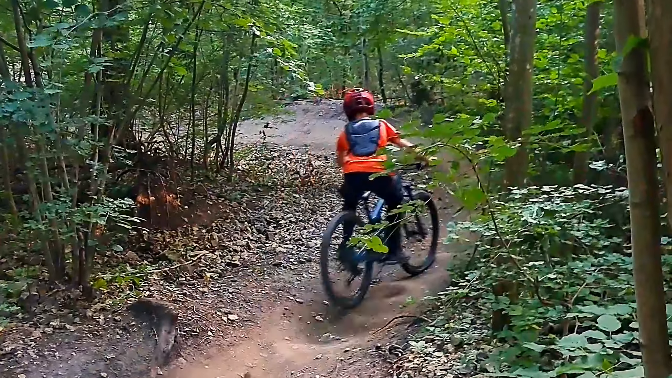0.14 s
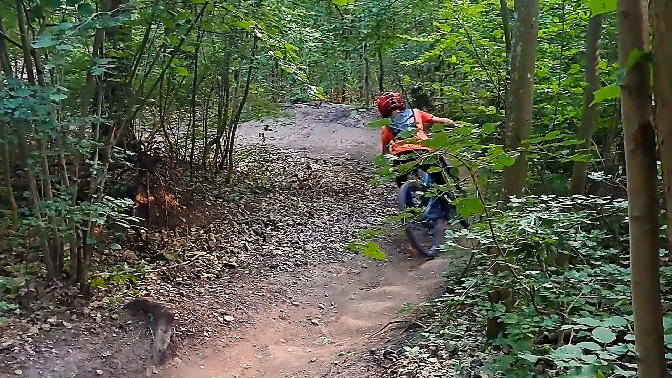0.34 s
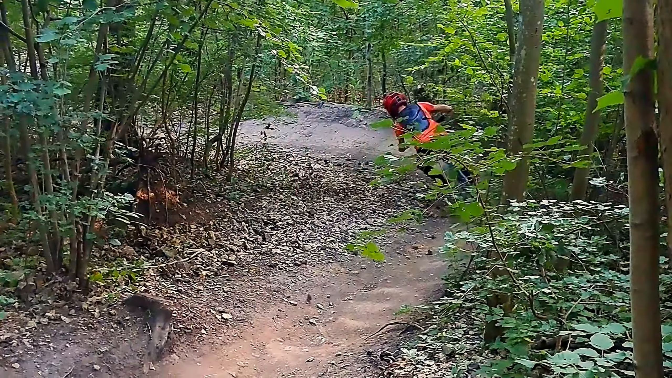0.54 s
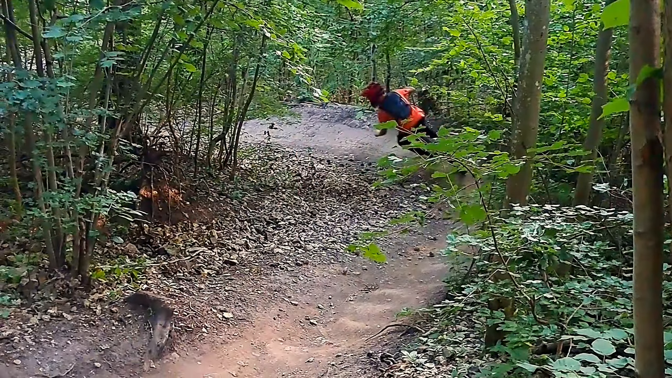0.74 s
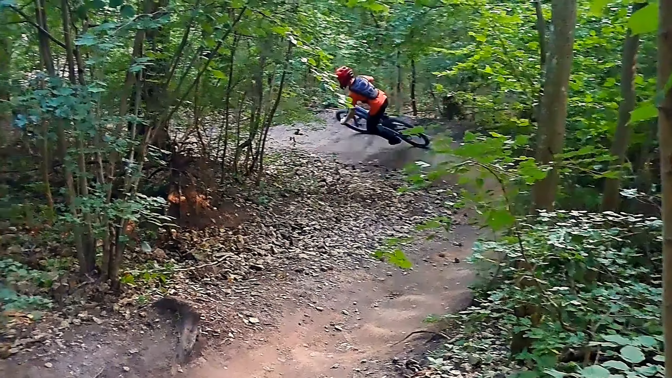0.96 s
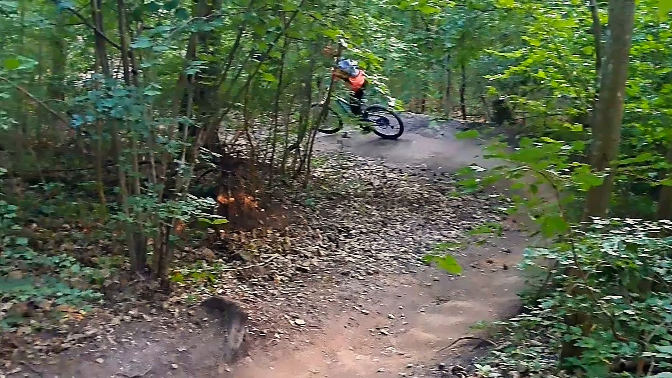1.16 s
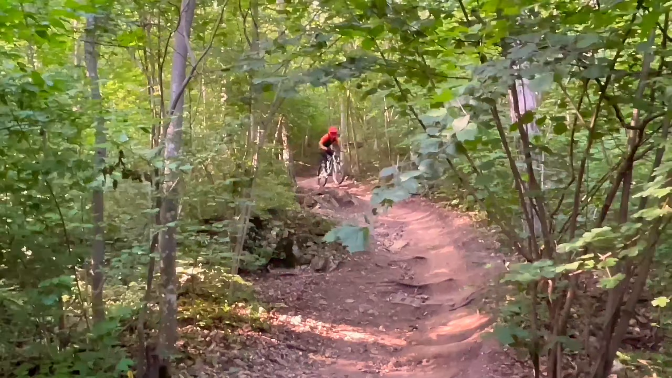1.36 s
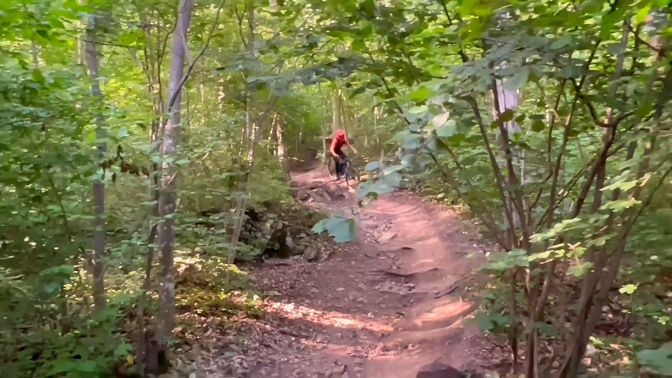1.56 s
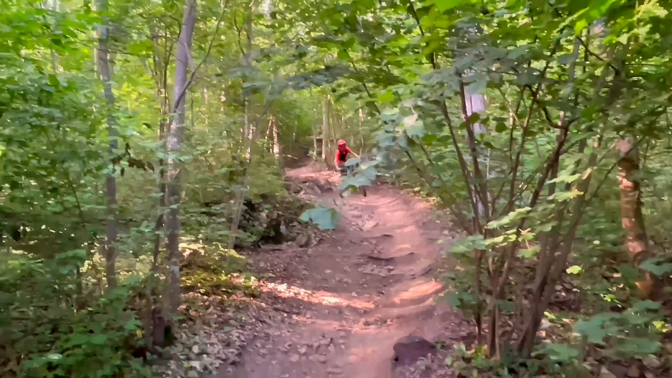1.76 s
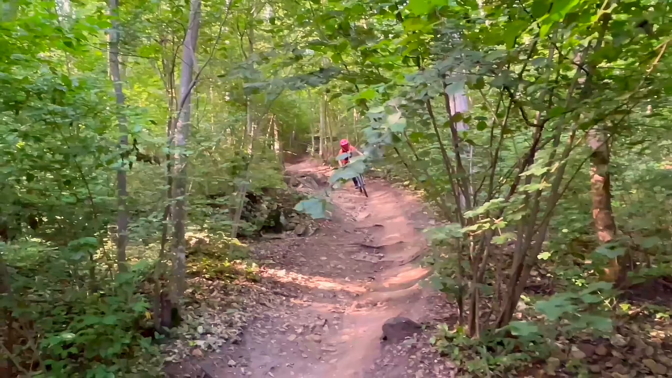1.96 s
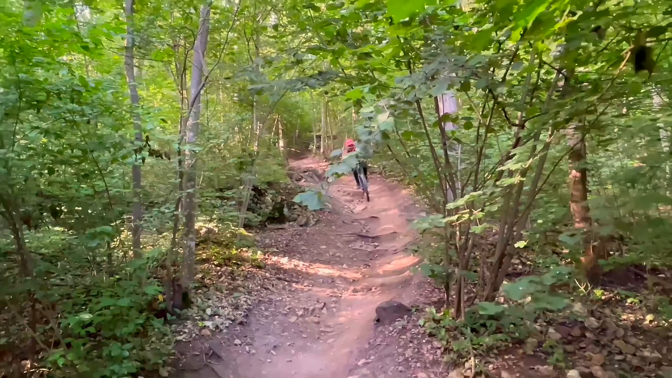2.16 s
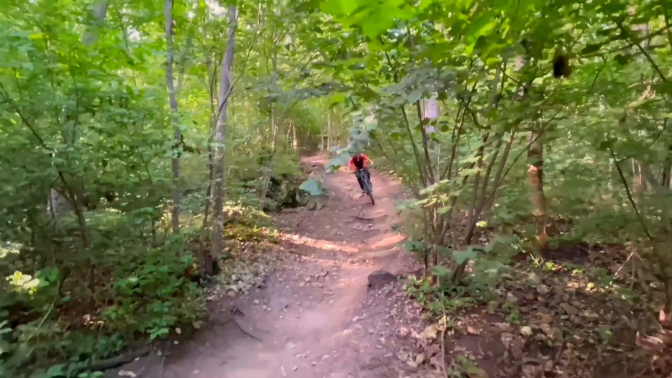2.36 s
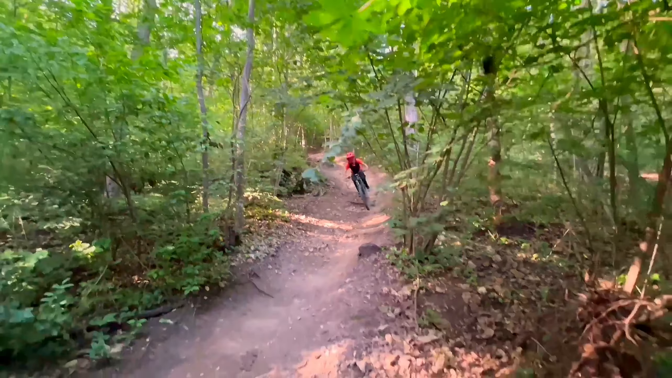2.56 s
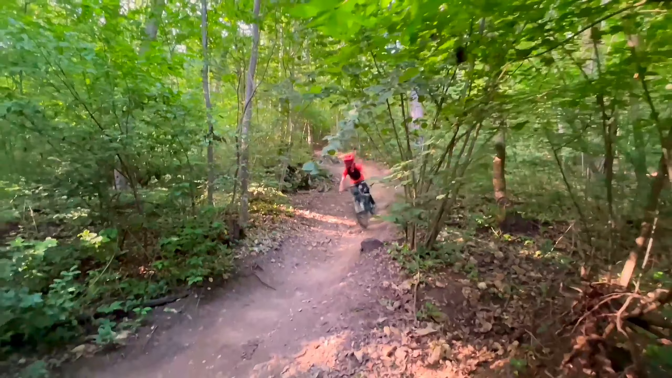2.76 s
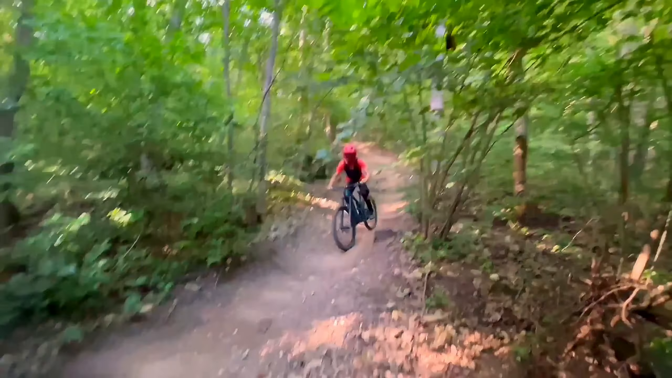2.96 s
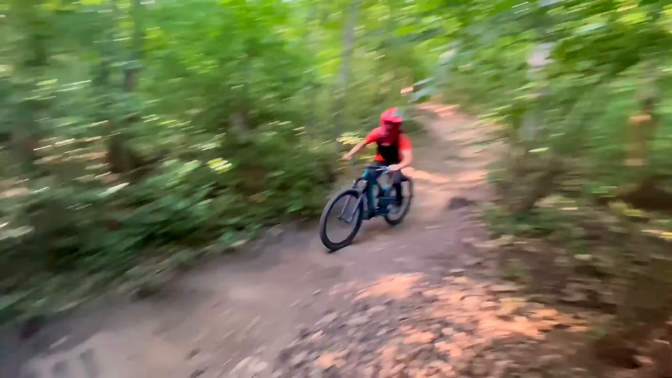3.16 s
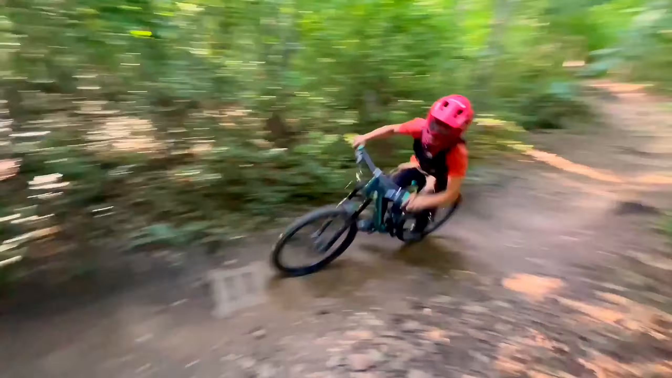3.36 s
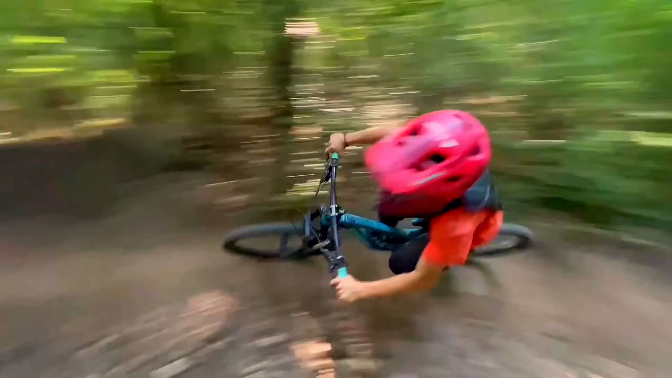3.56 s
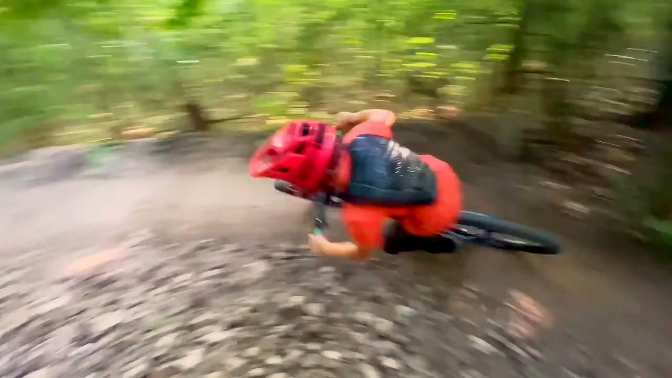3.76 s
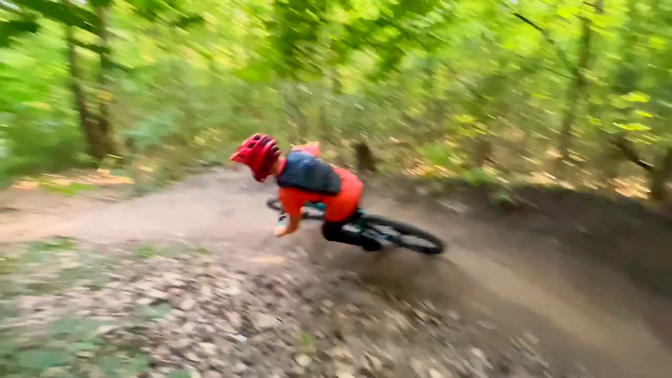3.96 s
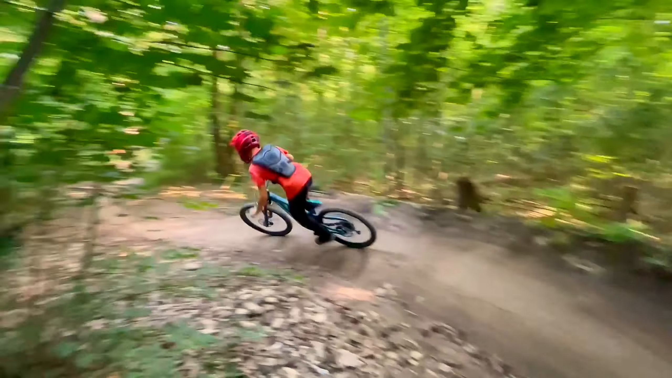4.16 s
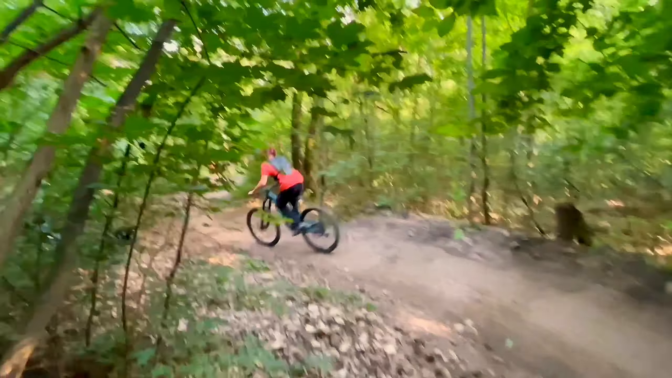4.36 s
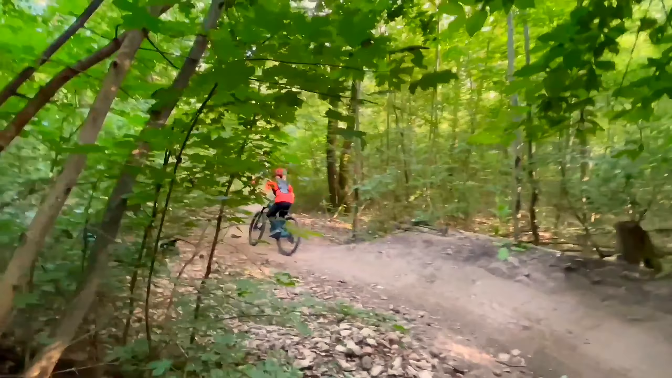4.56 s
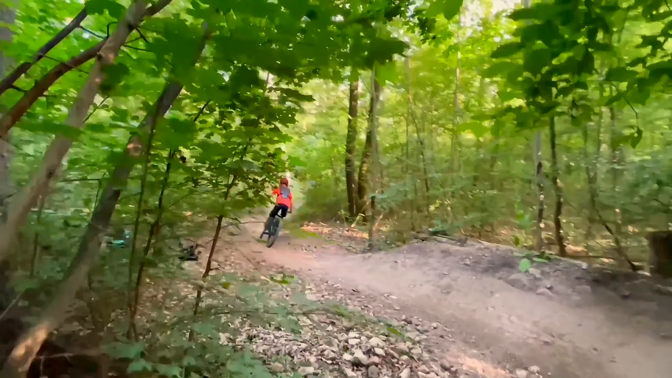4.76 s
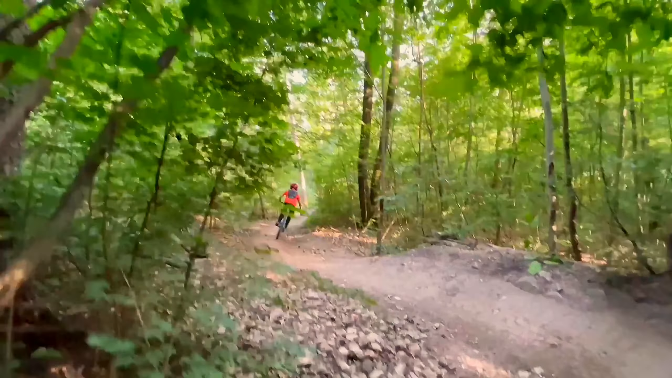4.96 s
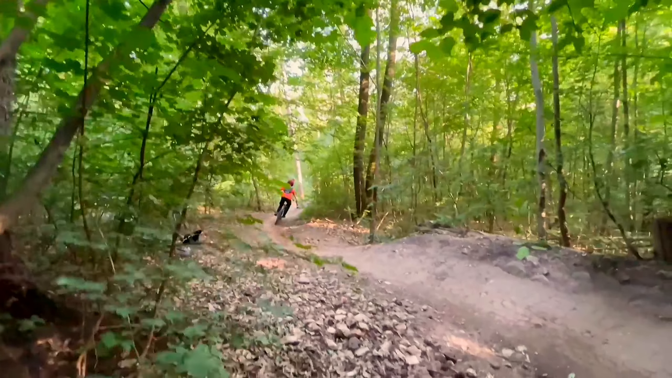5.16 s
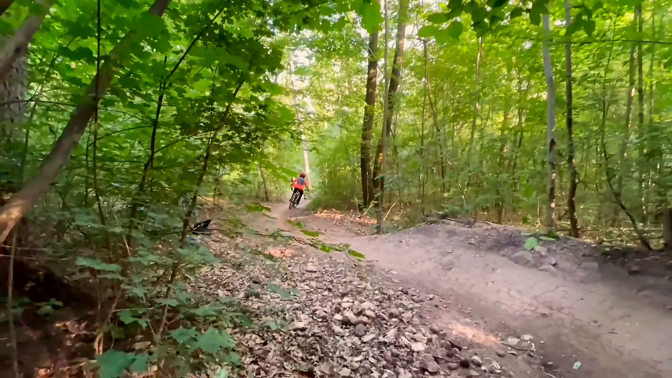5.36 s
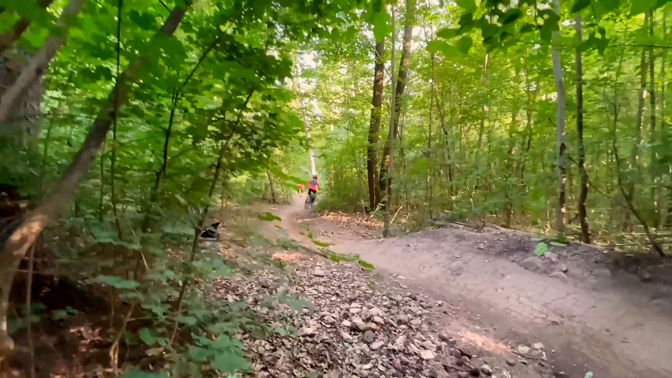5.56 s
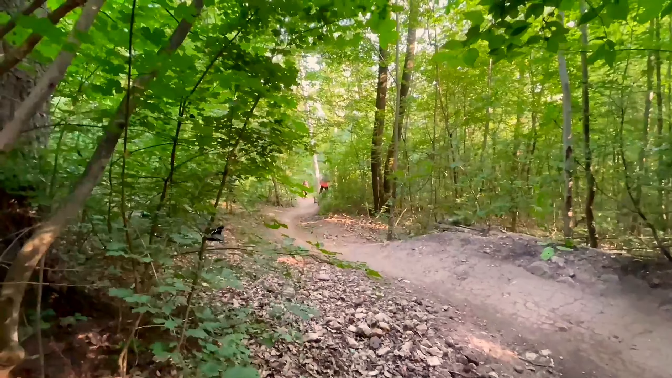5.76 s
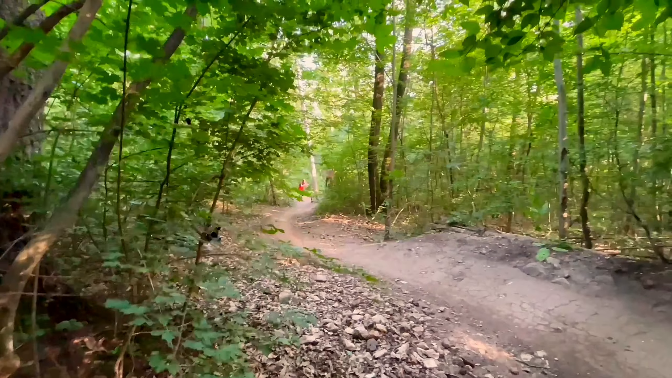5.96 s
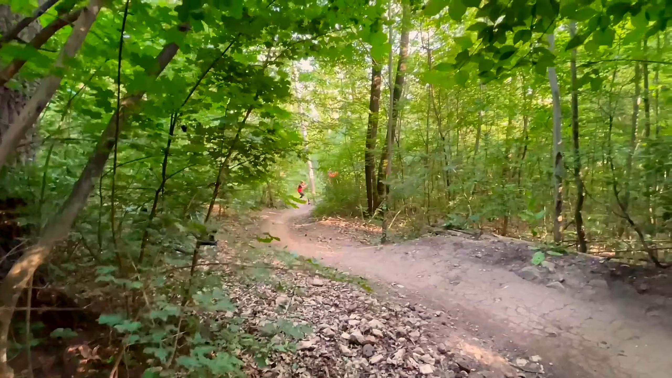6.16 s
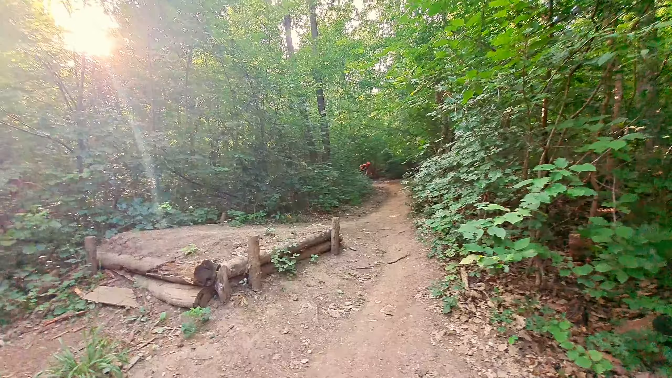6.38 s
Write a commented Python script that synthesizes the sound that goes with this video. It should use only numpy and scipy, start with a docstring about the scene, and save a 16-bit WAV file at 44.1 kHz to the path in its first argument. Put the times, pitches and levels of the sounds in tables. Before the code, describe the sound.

Outdoor stereo pickup among trees: first a bike clatters off over bumps, its tyres humming softly, and is cut to near silence. Then faint crunches and ticks from the left grow into dense chain rattle, wheel thumps and a loud rasping skid-like sweep past. It leaves quickly, with gravel crunch, thin echoes, faint wind and a few late knocks.

```python
"""A mountain bike clatters over roots and rides away down a dirt forest trail; the sound cuts to
quiet, then a bike comes nearer over more roots, carves a banked turn close by and rolls off.
Filtered noise and random grains make the tyres rumble, crunch and hiss over the soil.
Bursts and dying tones make the chain, frame and wheels clatter, thump and knock at the bumps.
Faint random echoes stand for the trees, over very quiet forest air and a late breath of wind."""
import sys
import numpy as np
from scipy import signal
from scipy.fft import rfft, irfft
from scipy.io import wavfile
from scipy.ndimage import uniform_filter1d

SR = 44100
rng = np.random.default_rng(int(sys.argv[2]) if len(sys.argv) > 2 else 0)


def generate_wav(sig):
    """Save sig (samples, or channels by samples) to the path in sys.argv[1] as 16-bit PCM at SR."""
    pcm = np.round(np.clip(np.atleast_2d(sig).T, -1, 1) * 32767).astype(np.int16)
    wavfile.write(sys.argv[1], SR, pcm)


N = 283122
TIME = np.arange(N) / SR  # seconds

# Deep noise of the ground under the tyres, and of wind. Each row: frequency in Hz, relative dB per Hz.
RUMBLE = [(20, -17), (35, -2.5), (60, 4), (95, -3.5), (140, -8.5), (220, -8.5), (400, -42.5)]
# Bright hiss of dust and grit. Each row: frequency in Hz, relative dB per Hz.
SPRAY = [(1200, -9), (2900, 0.5), (4200, 0.5), (5100, 2), (5700, 0.5), (6700, 1), (7500, -5), (8600, 1),
         (10200, -1.5), (12500, -3.5), (15000, -11)]
CUT_START_S, CUT_END_S = 1.387, 1.578  # the sound cuts to quiet air between these times


def amp(db):
    """Turns decibels into gain."""
    return 10 ** (np.asarray(db) / 20)


def unit(x):
    """Scales a sound to an average (rms) level of 1."""
    return x / np.sqrt(np.mean(x ** 2) + 1e-20)


def read(points, hz):
    """Reads a table between its points, with frequency on a log axis."""
    f, value = np.transpose(points)
    return np.interp(np.log(hz + 1), np.log(f + 1), value)


def follow(rows):
    """Reads each column of a table of times at every sample."""
    s, *columns = np.transpose(rows)
    return [np.interp(TIME, s, column) for column in columns]


def during(start, end, fade_s=0.0057):
    """Makes a gate that is 1 from start to end, with soft edges."""
    return np.clip(np.minimum(TIME - start, end - TIME) / fade_s + .5, 0, 1)


def add(mix, s, sound):
    """Mixes a sound in at time s."""
    part = mix[:, max(round(s * SR), 0):][:, :sound.shape[-1]]
    part += sound[..., :part.shape[1]]


def colour(x, points, size=4096):
    """Filters a sound to the given spectrum, without pre-echo and with unit filter energy."""
    log_gain = np.log(amp(read(points, abs(np.fft.fftfreq(size, 1 / SR)))))
    # the Hilbert transform supplies the phase that puts the response as early as possible
    spectrum = np.exp(np.conj(signal.hilbert(log_gain)))
    taps = np.fft.ifft(spectrum).real[:size // 2]
    return signal.oaconvolve(x, taps[None] / np.linalg.norm(taps), axes=1)[:, :N]


def wander(hz):
    """Drifts smoothly at random, mostly at rates near the one given, with rms 1."""
    ratio = np.fft.rfftfreq(N, 1 / SR) / hz
    noise = rfft(rng.standard_normal(N))
    return unit(irfft(noise * ratio / (1 + ratio ** 4), N))


def resonate(x, hz, width):
    """Rings a resonance of the given width in Hz, whose centre may move."""
    turn = np.exp(2j * np.pi * np.cumsum(hz * np.ones(N)) / SR)
    r = np.exp(-np.pi * width / SR)
    # shift the centre down to zero, smooth there, then shift it back up
    low = signal.lfilter([(1 - r) ** 2], [1, -2 * r, r * r], x / turn)
    return unit((turn * low).real)


def grains(per_s, spread_db, bed):
    """Scatters crumbs of uneven size over a bed of noise, the sum of countless tiny ones."""
    size_db = spread_db * np.minimum(rng.exponential(1, N), 3)
    size = amp(size_db) * (rng.random(N) < per_s / SR)
    crumbs = unit(size * rng.choice([-1, 1], (2, N)))
    return unit(crumbs + bed * rng.standard_normal((2, N)))


def rolling():
    """Gives the level of the rolling tyres in dB, and where the trail is rooty (0 to 1)."""
    # Level riding away, coming nearer and leaving. Each row: time in seconds, level in dB.
    away = [(0, -36), (.1, -33), (.16, -45.5), (.56, -46.5), (.62, -36), (.8, -46.5), (1.0, -47),
            (1.14, -41.5), (1.27, -50.5), (1.33, -61.5), (1.39, -58.5)]
    approach = [(1.681, -72), (1.73, -64.5), (1.83, -55.5), (2.2, -67), (2.33, -57), (2.58, -60.5),
                (2.73, -49.5), (3.2, -51.5), (3.41, -38), (3.47, -33), (3.62, -30.5), (3.68, -26)]
    leaving = [(3.68, -27.5), (3.78, -35), (4.1, -31.5), (4.19, -42), (4.7, -42), (4.97, -50.5),
               (5.3, -47.5), (5.55, -50.5), (5.8, -49.5), (6.08, -59.5), (6.22, -56), (6.29, -52.5),
               (6.42, -53)]
    # Stretches ribbed with roots. Each row: start in seconds, end in seconds.
    root_spans = [(0, .75), (1.68, 3.45)]
    approach_s = approach[0][0]
    level_db = np.where(TIME < approach_s, follow(away)[0], follow(approach + leaving)[0])
    level_db = level_db - 23.5 * during(CUT_START_S, approach_s)  # extra drop until the approach
    return level_db, sum(during(*span) for span in root_spans)


def clods(fade_s=0.028):
    """Swells the level, in dB, at random moments as lumps of soil give way, then lets it die away."""
    clods_per_s, clod_db = 38, 2
    strikes = np.minimum(rng.exponential(1, N), 2) * (rng.random(N) < clods_per_s / SR)
    swell = signal.lfilter([1], [1, -np.exp(-1 / (fade_s * SR))], strikes)
    return clod_db * (swell - swell.mean())


def tyres():
    """Rolling tyres shake the ground, hum, crush crumbs of soil and hiss brightly."""
    # Soil crunching. Each row: frequency in Hz, relative dB per Hz.
    crunch_spectrum = [(70, -24.5), (150, -1.5), (250, 1), (400, -0.5), (560, -0.5), (750, -4.5),
                       (1000, -4.5), (1300, -6.5), (1800, -5.5), (2350, -11), (3100, -18.5), (4500, -23.5),
                       (9000, -46.5)]
    # Swells of bright hiss; the one at 1.64 s is faint background hiss.
    # Each row: middle in seconds, half length in seconds, level in dB.
    hiss_swells = [(0.02, 0.055, -42.5), (0.25, 0.22, -45), (0.647, 0.11, -42.5), (1.297, 0.1, -60.5),
                   (1.64, .06, -82), (1.874, 0.11, -65), (2.468, 0.046, -62), (2.795, 0.071, -50.5),
                   (3.332, 0.11, -48.5), (3.654, 0.15, -36.5), (4.22, 0.057, -43.5), (4.342, 0.057, -40.5),
                   (4.522, 0.084, -48.5), (4.783, 0.16, -54.5), (4.965, 0.2, -55.5), (6.257, 0.021, -54),
                   (6.338, 0.29, -58)]
    # Tread humming on hard-packed ground.
    # Each row: start in seconds, end in seconds, pitch in Hz, level in dB against the rolling.
    hum_spans = [(0.293, 1.043, 587, -4), (0.987, 1.31, 282, -15), (1.758, 2.05, 535, -3),
                 (3.602, 4.157, 409, -4.5), (4.48, 5.837, 241, -7), (6.268, 6.41, 425, -1),
                 (6.338, 6.41, 620, 1)]
    rumble_db, rooty_rumble_db, spray_db = -9.5, 6.5, -10.5  # rumble and spray against the rolling
    far_db, far_dulling = -54.5, 0.94  # below far_db the spray loses extra dB for each dB

    roll_db, rooty = rolling()
    ground = wander(hz=41.7)  # lumps in the trail press the tyre harder
    low = colour(rng.standard_normal((2, N)), RUMBLE)
    low = low * amp(roll_db + rumble_db + rooty_rumble_db * rooty)

    mid = colour(grains(per_s=1200, spread_db=0.5, bed=0.83), crunch_spectrum)
    mid = mid * amp(roll_db + 0.93 * ground + clods())

    swells = sum(amp(db) * np.exp(-((TIME - s) / half) ** 2) for s, half, db in hiss_swells)
    spray = amp(roll_db + spray_db - far_dulling * np.maximum(far_db - roll_db, 0))
    high = colour(grains(per_s=1200, spread_db=6.5, bed=2.1), SPRAY)
    high = high * np.hypot(spray, swells) * amp(0.34 * ground)

    tread = rng.standard_normal((2, N))
    hum = np.zeros((2, N))
    for start, end, hz, db in hum_spans:
        hum += resonate(tread, hz, width=142) * amp(db) * during(start, end, fade_s=0.037)
    return low + mid + high + hum * amp(roll_db + 1.8 * wander(hz=25))


def gravel():
    """Loose gravel grinds under the tread as random grains of uneven size."""
    # Each row: start in seconds, end in seconds, grains per second, level in dB against the rolling.
    gravel_spans = [(1.77, 2.6, 150, -10.5), (2.594, 3.348, 160, -13), (3.497, 3.76, 240, -7.5),
                    (4.286, 4.405, 700, 2), (4.4, 5.93, 214, -8)]
    # Sound of the grains. Each row: frequency in Hz, relative dB per Hz.
    pebble_spectrum = [(250, -19), (600, 7.5), (1000, 3), (2000, 3.5), (2800, -23.5), (3600, -15.5),
                       (5000, -9.5), (8000, -21), (14000, -30)]
    crunch = np.zeros((2, N))
    for start, end, per_s, db in gravel_spans:
        grit = grains(per_s=per_s, spread_db=4.5, bed=0.05)
        crunch += grit * amp(db) * during(start, end, fade_s=0.15)
    return colour(crunch, pebble_spectrum) * amp(rolling()[0] + 1.3 * wander(hz=50))


def bright_crackle():
    """Sparse grains through one resonance crackle brightly around 3 kHz as the bike approaches."""
    start_s, end_s, centre_hz, level_db = 2.34, 3, 3250, -8.5  # level against the rolling
    crackle = resonate(grains(per_s=120, spread_db=2.5, bed=0.088), centre_hz, width=1100)
    return crackle * amp(rolling()[0] + level_db) * during(start_s, end_s, fade_s=0.064)


def tread_notes():
    """Evenly spaced tread knobs strike smooth ground and sing clear, gliding notes."""
    # Each row: start in seconds, end in seconds, first pitch in Hz, last pitch in Hz, level in dB.
    # The pitches are those before a slight random waver.
    note_rows = [(0.885, 0.982, 251, 264, -52.5), (1.091, 1.179, 290, 245, -44),
                 (1.044, 1.25, 139.4, 128, -49.5), (3.804, 3.997, 272, 256.2, -32),
                 (4.043, 4.165, 148, 145, -35.5), (4.93, 5.072, 249, 239, -56)]
    waver = 1 + 0.013 * wander(hz=30)
    out = np.zeros((2, N))
    for start, end, first_hz, last_hz, db in note_rows:
        glide_hz = np.interp(TIME, [start, end], [first_hz, last_hz])
        turns = np.cumsum(glide_hz * waver) / SR
        # only the part common to both channels
        out[0] += amp(db) * np.sin(2 * np.pi * turns) * during(start, end, fade_s=0.04)
    return out * amp(0.53 * wander(hz=40))


def banked_turn():
    """Leaning hard, the side knobs slip and snap back: the carcass drones and the tread rasps."""
    # Tyre resonances. Each row: centre in Hz, width in Hz, relative level in dB.
    carcass = [(272, 124, -0.5), (854, 92, -8.5), (3700, 1800, -9)]
    turn_start_s, turn_end_s, attack_s, release_s = 3.56, 4.138, 0.026, 0.01
    drone_end_db, drone_rise = -30, 30  # level at the end of the turn, growth towards it in dB per s
    scrub_full_db, scrub_full_s, scrub_rise = -30.5, 3.913, 64  # the rasp; its growth in dB per s
    scrub_start_hz, scrub_glide, scrub_width_hz = 1490, 140, 530  # the glide is in Hz per s

    rise = (TIME - turn_start_s) / attack_s
    fall = 1 - (TIME - turn_end_s) / release_s
    lean = np.clip(np.minimum(rise, fall), 0, 1)
    drone_db = drone_end_db - drone_rise * np.maximum(turn_end_s - TIME, 0)
    scrub_db = scrub_full_db - scrub_rise * np.maximum(scrub_full_s - TIME, 0)

    # about 135 slips a second, at an uneven pace; each starts sharply and fades
    knobs = np.cumsum(135 * (1 + 0.32 * wander(hz=63.2))) / SR
    slips = unit(.5 + np.exp(-(knobs % 1) / 0.19))
    drive = slips * grains(per_s=2700, spread_db=2.0, bed=0.5)
    drone = unit(sum(amp(db) * resonate(drive, hz, width) for hz, width, db in carcass))

    # the rasp rises as the tread bites harder
    scrub_hz = scrub_start_hz + scrub_glide * np.clip(TIME - scrub_full_s, 0, .3)
    scrub_hz = scrub_hz * (1 + .05 * wander(hz=46))  # grip comes and goes
    scrub = resonate(resonate(drive, scrub_hz, scrub_width_hz), scrub_hz, scrub_width_hz)
    return (drone * amp(drone_db) + scrub * amp(scrub_db)) * lean


def jolts():
    """Adds lesser bumps at random moments on the rooty stretches, as rows like those in bumps()."""
    jolts_per_s, clatter_db, thump_db, spread_db = 11, -2, 9, 0.5  # levels against the rolling
    roll_db, rooty = rolling()
    at = np.flatnonzero(rng.random(N) < rooty * jolts_per_s / SR)
    level_db = roll_db + spread_db * rng.standard_normal(N)
    return [(i / SR, level_db[i] + clatter_db, level_db[i] + thump_db, 0) for i in at]


def ring(modes, t, detune):
    """Sums dying tones, a little out of tune from one blow to the next."""
    shift = np.exp(detune * rng.standard_normal(len(modes)))
    out = np.zeros(len(t))
    for k, (hz, db, t60) in enumerate(modes):
        out += (-1) ** k * amp(db - 60 * t / t60) * np.sin(2 * np.pi * hz * shift[k] * t)
    return out


def bumps():
    """Each bump thumps a wheel, slaps the chain on the frame, sets it chattering and kicks up grit."""
    # Roots and holes. Each row: time in seconds, clatter level in dB before the trims below,
    # wheel thump level in dB, seconds the chain keeps rattling before it dies away.
    bump_rows = [(.001, -19.5, -41, 0.0037), (0.041, -29, -29, 0.02), (0.075, -22, -32.5, 0.013),
                 (0.139, -31, -39, .002), (.177, -12.5, -27, 0.021), (0.221, -23, -23.5, 0.0097),
                 (0.2749, -14, -31, 0.021), (.323, -22.5, -31.5, .001), (.365, -21, -35, 0.0018),
                 (0.442, -40, -28, 0.00052), (0.471, -22.5, -31, 0.013), (.503, -32.5, -40, 0.011),
                 (0.572, -19, -23, 0.00094), (0.594, -29, -34.5, 0.0013), (0.622, -38, -28, 0.0098),
                 (1.228, -36.5, -52, 0.021), (1.58, -52, -87.5, 0.0026), (1.679, -50.5, -41, 0.0062),
                 (1.758, -39.5, -49, .002), (1.78, -47, -54, 0.0023), (1.796, -44, -44, 0.011),
                 (1.825, -47, -57, .003), (1.887, -40, -63, 0.0035), (1.946, -40, -61, 0.0094),
                 (2.022, -45, -53, .003), (2.132, -45, -51.5, .001), (2.258, -42.5, -47, 0.0031),
                 (2.343, -44, -58, 0.004), (2.425, -39.5, -52, 0.017), (2.477, -42, -45, 0.0096),
                 (2.502, -40, -48, .001), (2.566, -43, -62, .002), (2.579, -34.5, -44, 0.0027),
                 (2.597, -41, -40, .002), (2.656, -36, -44, 0.009), (2.69, -31.5, -33, 0.01),
                 (2.75, -33.5, -38, 0.012), (2.777, -40, -50, 0.0018), (2.829, -25.5, -34.5, 0.0065),
                 (2.873, -31.5, -37, 0.0053), (2.902, -38, -52, 0.011), (2.963, -30.5, -37, 0.0038),
                 (2.986, -37, -46, .002), (3.009, -32.5, -36, 0.016), (3.041, -34.5, -53, 0.0087),
                 (3.085, -38, -50, .006), (3.102, -29, -38, 0.005), (3.142, -28, -35, 0.0046),
                 (3.16, -33, -37, 0.0053), (3.194, -28, -35, .001), (3.235, -18.5, -26, .002),
                 (3.27, -21.5, -29, 0.0071), (3.287, -31, -33, .002), (3.323, -28, -40, 0.00091),
                 (3.335, -31, -42, .002), (3.364, -19.5, -21.5, 0.013), (3.414, -16, -23, .001),
                 (3.4769, -7.5, -14, 0.0013), (3.511, -10, -19, 0.00085), (3.541, -17, -26, .001),
                 (3.567, -25, -33, 0.0015), (3.587, -30, -24, .001), (3.596, -13, -15, 0.0013),
                 (3.61, -15.5, -15, 0.003), (3.623, -6.5, -18, 0.0017), (3.655, -9.5, -33, 0.0011),
                 (3.705, -21, -28, .001), (4.194, -43, -32, .001), (4.261, -25, -46, 0.0045),
                 (4.285, -23.5, -37, .002), (4.516, -28.5, -48, .006), (4.643, -37, -54, .004),
                 (4.837, -38, -54, .002), (4.872, -37, -51, .002), (5.041, -36, -36.5, 0.008),
                 (5.363, -49, -56, .003), (6.177, -36.5, -63, 0.00092), (6.229, -37, -47, 0.014),
                 (6.253, -30, -41, 0.0032), (6.279, -41, -50, 0.0036), (6.361, -38, -46, .005)]
    # Chain and frame. Each row: frequency in Hz, relative dB per Hz.
    clatter_spectrum = [(120, -14), (250, -6.5), (400, 0.5), (600, 2.5), (800, -2.5), (1020, -1.5),
                        (1250, -2.5), (1750, -0.5), (2200, -9), (2800, -7.5), (3400, -10), (4400, -14),
                        (7000, -22.5), (12000, -39.5)]
    # Wheel and ground tones before detuning.
    # Each row: pitch in Hz, level in dB, seconds to fall by 60 dB.
    wheel_modes = [(47.8, -2, 0.12), (69, 0, 0.12), (124.3, 2, 0.069), (243, 0.5, 0.041)]
    chain_t60_s, tail_t60_s, tail_db = 0.057, 0.19, -16.5  # fast fall, then a weaker, slower tail
    strike_db, strike_lag_s = 13.5, 0.002  # first slap against the chatter, and how late it comes
    rattle_db, grit_db = -10.5, -30  # trims of the chain and the grit

    chatter, solid = np.zeros((2, 2, N))
    t = np.arange(SR // 4) / SR
    contacts = grains(per_s=2600, spread_db=1.8, bed=0.39)
    strike = amp(strike_db) * (np.arange(len(t)) == round(strike_lag_s * SR))
    for s, clatter_db, thump_db, rattle_s in bump_rows + jolts():
        burst = np.roll(contacts, -round(s * SR), axis=1)[:, :len(t)]
        after = np.maximum(t - rattle_s, 0)
        fall = amp(-60 * after / chain_t60_s) + amp(tail_db - 60 * after / tail_t60_s)
        rattle = burst * fall * (1 - np.exp(-t / 0.0014))
        add(chatter, s, amp(clatter_db) * (strike + rattle))
        thump = ring(wheel_modes, t, detune=0.1) * (1 - np.exp(-t / 0.0058))
        add(solid[:1], s, amp(thump_db) * thump)  # bass is common to both channels
    chain = amp(rattle_db) * colour(chatter, clatter_spectrum)
    grit = amp(grit_db) * colour(chatter, SPRAY)
    return chain + grit + solid


def dying_tones():
    """Short dying tones knock on bumps strong and faint, sometimes several together."""
    # Each row: time in seconds, pitch in Hz, level in dB.
    tone_rows = [(.001, 260, -18.5), (.046, 607, -22.5), (.054, 1324, -21.5), (.179, 1094, -15),
                 (0.184, 1780, -13.5), (.188, 527, -12), (.196, 278, -17.5), (0.284, 1820, -22),
                 (.571, 305, -24), (1.78, 560, -39), (1.828, 537, -46), (1.946, 550, -35.5),
                 (2.26, 597, -39), (2.342, 565, -41), (2.58, 440, -41), (2.693, 493, -47),
                 (2.831, 930, -29.5), (2.964, 1010, -33), (3.054, 1490, -32.5), (3.269, 680, -23),
                 (3.286, 640, -25.5), (3.365, 1536, -18), (3.479, 287, -10), (3.513, 2070, -14),
                 (3.569, 1390, -15), (3.589, 266, -9), (3.611, 309, -8.5), (3.614, 105, -9.5),
                 (3.653, 480, -8.5), (3.666, 286, -21), (3.702, 350, -15), (3.715, 332, -15),
                 (4.28, 646, -21), (6.179, 830, -31), (6.2582, 996, -27.5)]
    t60_s = 0.034  # time to fall by 60 dB
    out, t = np.zeros((2, N)), np.arange(SR // 10) / SR
    for s, hz, db in tone_rows:
        mode = np.array([np.sin(2 * np.pi * hz * t), np.cos(2 * np.pi * hz * t)])
        add(out, s, amp(db - 60 * t / t60_s) * mode * (1 - np.exp(-t / 0.00042)))
    return out


def hard_ticks():
    """Short hard ticks and cracks of noise, each in its own band, many at the front of a bump."""
    # Each row: time in seconds, peak level in dB, lowest Hz, highest Hz, seconds to fall by 60 dB.
    tick_rows = [(0.056, -26, 700, 2560, 0.018), (0.083, -41, 800, 3000, 0.021),
                 (.1835, -10.5, 700, 2940, 0.014), (0.2921, -13, 900, 2840, 0.027),
                 (0.364, -29, 990, 3200, 0.021), (.442, -36, 900, 2650, .025),
                 (.572, -28, 600, 2950, 0.015), (1.347, -45.5, 6400, 8500, 0.041),
                 (1.677, -53, 2800, 4300, 0.098), (1.805, -42, 2670, 4000, 0.057),
                 (2.209, -60, 2510, 5000, 0.067), (2.336, -64, 3000, 4150, 0.042),
                 (2.577, -50, 3180, 4130, .04), (2.66, -42, 3150, 4270, .05),
                 (2.781, -35.5, 3160, 4840, 0.045), (2.831, -45, 2940, 4640, 0.043),
                 (3.056, -33, 1800, 3000, .02), (3.2365, -28, 1320, 3170, 0.011),
                 (3.324, -28.5, 1500, 4020, 0.032), (3.3758, -21.5, 1100, 2370, 0.02),
                 (3.415, -26, 1000, 3950, 0.026), (3.4773, -18.5, 700, 3930, 0.0056),
                 (3.514, -8.5, 1060, 2690, 0.0073), (3.584, -20, 900, 4000, 0.02),
                 (3.599, -16, 1200, 5000, 0.0045), (3.6224, -12.5, 700, 3470, 0.0037),
                 (3.6443, -19, 1300, 2300, 0.01), (3.6224, -12.5, 3980, 12300, 0.13),
                 (3.639, -23.5, 4500, 13100, 0.083), (4.263, -24.5, 800, 2700, 0.046),
                 (4.459, -32.5, 5000, 10100, 0.082), (4.517, -35, 4530, 7000, .02),
                 (4.953, -37.5, 4500, 7500, 0.013), (5.017, -30, 4070, 9600, 0.0068),
                 (5.3246, -42.5, 4000, 9000, 0.026), (6.148, -41, 700, 2280, 0.014),
                 (6.16, -45, 900, 1500, 0.033), (6.179, -38, 620, 1100, 0.023),
                 (6.204, -40, 715, 1530, .022), (6.243, -34, 600, 1400, .015),
                 (6.255, -31, 1680, 2960, 0.015), (6.258, -30.5, 780, 1280, 0.016),
                 (6.256, -33, 3800, 7600, 0.029)]
    out, t = np.zeros((2, N)), np.arange(SR // 10) / SR
    for s, db, low_hz, high_hz, t60 in tick_rows:
        band = signal.butter(2, [low_hz, high_hz], "bandpass", fs=SR, output="sos")
        envelope = amp(-60 * t / t60) * (1 - np.exp(-t / 0.0004))
        tick = signal.sosfilt(band, rng.standard_normal((2, len(t))) * envelope)
        add(out, s, amp(db) * tick / abs(tick).max(axis=1, keepdims=True))
    return out


def trees(x, t60=0.4):
    """Trunks and leaves scatter the sound into a thin tail of random echoes."""
    # Strength along the ride. Each row: time in seconds, level in dB against the direct sound.
    scatter = [(.2, -16), (1.3, -13), (1.8, -4), (3.0, -15), (3.5, -14.5), (4.2, -15), (5.8, -5),
               (6.2, -24)]
    t = np.arange(SR // 2) / SR
    taps = rng.standard_normal((2, len(t))) * (rng.random((2, len(t))) < 2000 / SR)
    taps *= amp(-60 * t / t60) * (1 - np.exp(-t / 0.0027))
    taps /= np.linalg.norm(taps[0])
    return x + signal.oaconvolve(x * amp(follow(scatter)[0]), taps, axes=1)[:, :N]


def breeze():
    """Light wind on the microphone is deep noise whose level drifts at random."""
    start_s, end_s, level_db = 4.6, 6.5, -61
    gusts = amp(level_db + 5.6 * wander(hz=2.3))
    wind = colour(rng.standard_normal((2, N)), RUMBLE)
    return wind * gusts * during(start_s, end_s, fade_s=0.16)


def forest_air():
    """Still forest air is very quiet, steady noise."""
    # Each row: frequency in Hz, relative dB per Hz.
    air_spectrum = [(20, -12.5), (60, -2), (250, -8.5), (600, -6.5), (2000, -14.5), (5000, -18.5),
                    (15000, -34)]
    return amp(-83.0) * colour(rng.standard_normal((2, N)), air_spectrum)


def place(x, patchy_db=2.5, dip_octaves=0.18):
    """Spreads the sound between left and right by likeness, delay, level and tone at each pitch."""
    # Where the bike is. Each row: time in seconds, position from 0 (right) to 1 (left).
    bearing = [(1.4, 0.39), (1.7, 0.76), (2.3, 0.91), (2.7, 0.91), (6.08, 1), (6.2, 0.47)]
    # Likeness of the channels, bike on the left then right. Each row: frequency in Hz, correlation.
    same_left = [(100, 0.84), (300, 1), (600, 0.92), (1000, 0.5), (1550, -0.23), (2300, 0.29),
                 (3300, -0.24), (4300, 0.16), (5500, -0.16), (8700, 0.2), (10300, -0.83), (11500, 0.17),
                 (13000, 1)]
    same_right = [(100, 1), (600, 0.87), (1500, 0.34), (2700, 0.22), (3500, -0.41), (4200, 0.093),
                  (6000, -0.33), (13000, 0.64)]
    # Left minus right level, bike on the left then right. Each row: frequency in Hz, dB.
    from_left = [(200, 3.5), (700, 6.5), (1300, 7.5), (1800, 1), (2300, -1), (3300, 2.5), (5500, 5.5),
                 (7500, 8), (9000, 2.5), (15000, -1.5)]
    from_right = [(300, -3.5), (750, -6.5), (1000, -6), (1550, -6), (1800, -11), (2700, -10), (4200, -9.5),
                  (7300, -18), (8500, -1.5), (15000, 5.5)]
    # Tone of the bike when it is off to the right. Each row: frequency in Hz, dB.
    right_tone = [(60, 6), (90, -17.5), (135, -1.5), (190, 11), (280, -0.5), (380, -9.5), (560, -0.5),
                  (800, -3), (1300, -3), (1850, 1), (2700, 3), (3400, -5.5), (7500, 1.5), (9000, -18),
                  (13000, -1)]
    # Head start of the left channel, before its share. Each row: frequency in Hz, phase in radians.
    left_lead = [(60, 0.58), (300, .35), (500, 0.93), (1000, 1.2), (1300, 0.45), (1700, 0)]
    # Share of that head start; below 0 the right leads. Each row: time in seconds, share.
    lead_share = [(1.4, -0.36), (1.7, 0.0037), (3.4, 0.57), (3.7, -0.26), (4.1, -0.49), (4.4, 1.26),
                  (6.1, 0.9), (6.23, 0.63)]
    # The echo off the ground weakens or lifts a moving band.
    # Each row: time in seconds, centre in Hz, change in dB.
    ground_echo = [(1.8, 810, -2.5), (2.6, 360, 0.5), (3.25, 390, -10), (3.5, 623, -12.5),
                   (4.45, 620, -11.5), (4.9, 373, -13), (6, 318, 3.5), (6.35, 784, -3)]

    hz, t, (common, differing) = signal.stft(x, SR, nperseg=512, noverlap=384)
    curves = follow(bearing) + follow(lead_share) + follow(ground_echo)
    left, lead, dip_hz, dip_db = (np.interp(t, TIME, curve) for curve in curves)

    crossed = np.clip((left - .35) / 0.59, 0, 1)  # 0 right likeness, 1 left likeness
    same = np.outer(read(same_left, hz), crossed) + np.outer(read(same_right, hz), 1 - crossed)
    same = np.clip(same, -.99, .99)
    mid, side = common * np.sqrt((1 + same) / 2), differing * np.sqrt((1 - same) / 2)

    early = np.exp(.5j * np.outer(read(left_lead, hz), lead))  # half of the lead on each channel
    # the body of the microphone shades the far side
    lean_db = np.outer(read(from_left, hz), left) + np.outer(read(from_right, hz), 1 - left)
    tone_db = np.outer(read(right_tone, hz), 1 - left)
    octaves = np.log2((hz[:, None] + 1) / dip_hz)
    tone_db += dip_db * np.exp(-(octaves / dip_octaves) ** 2)

    # shifting paths off the trunks lift and sink narrow bands
    patches = uniform_filter1d(rng.standard_normal(common.shape), size=2, axis=0)
    patches = unit(uniform_filter1d(patches, size=24, axis=1))
    tone_db += patchy_db * patches * (hz / (hz + 500))[:, None]  # less so in the bass

    left_part = (mid + side) * early * amp(tone_db + lean_db / 2)
    right_part = (mid - side) / early * amp(tone_db - lean_db / 2)
    pair = np.array([left_part, right_part])
    return signal.istft(pair, SR, nperseg=512, noverlap=384)[1][:, :N]


def scene():
    """Sets the bike among the trees, over very quiet forest air and a late breath of wind."""
    ground = tyres() + gravel() + bright_crackle() + tread_notes() + banked_turn()
    bike = trees(ground + bumps() + dying_tones() + hard_ticks())
    bike = bike * (1 - during(CUT_START_S, CUT_END_S))
    return place(bike + breeze() + forest_air())


def record(dry):
    """Cuts the deepest bass, rounds off the highest peaks and removes the top of the treble."""
    dry = signal.sosfilt(signal.butter(2, 34, "highpass", fs=SR, output="sos"), dry)
    dry = .9 * np.tanh(dry / .9)
    lowpass = signal.firwin(511, 15300, window=("kaiser", 9), fs=SR)  # edge in Hz
    return signal.oaconvolve(dry, lowpass[None], "same")


dry = scene()
out = record(dry)
generate_wav(out)
```